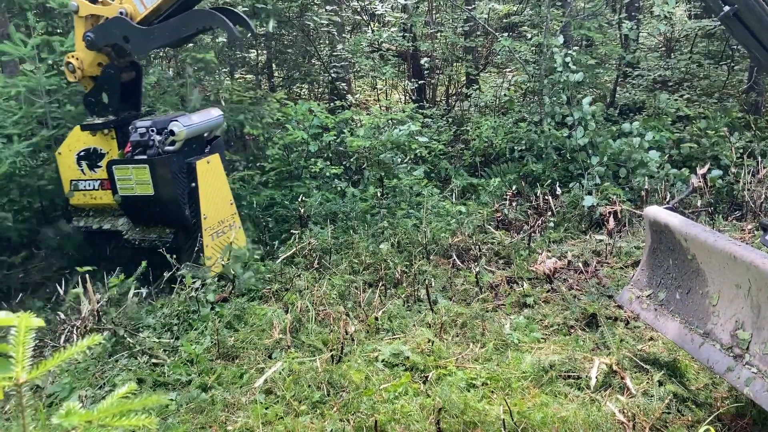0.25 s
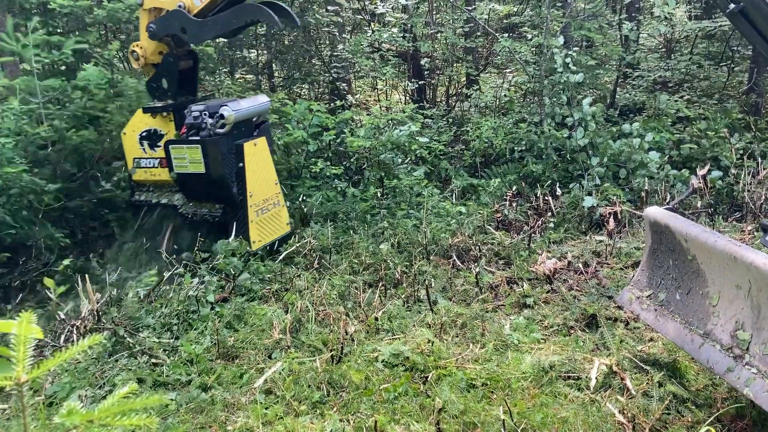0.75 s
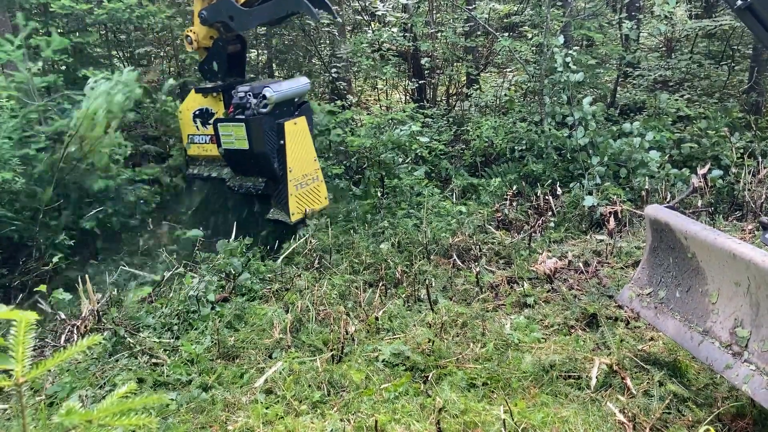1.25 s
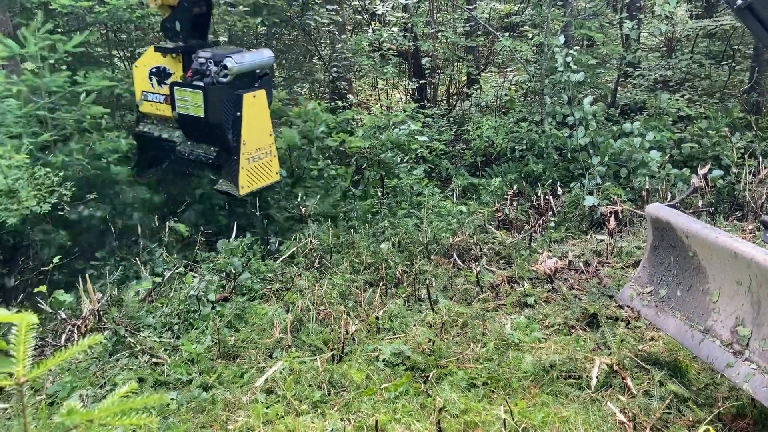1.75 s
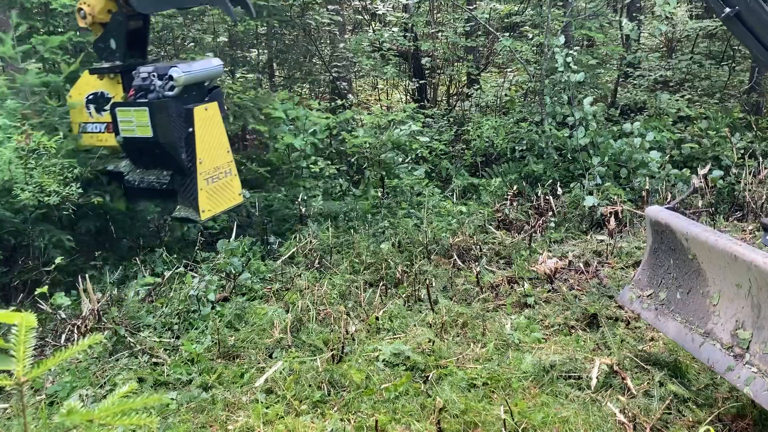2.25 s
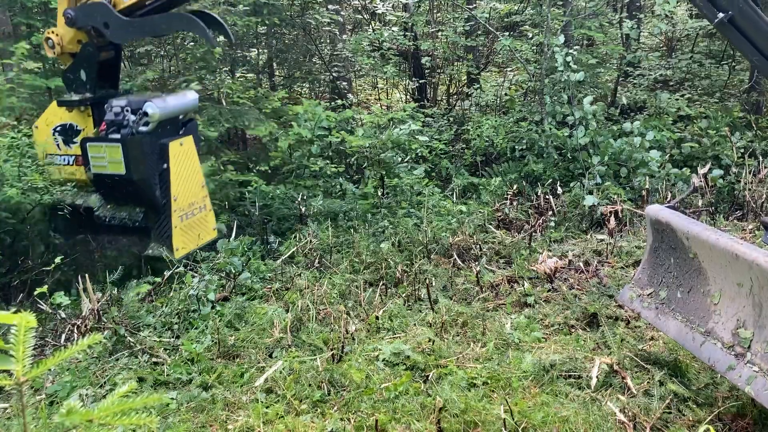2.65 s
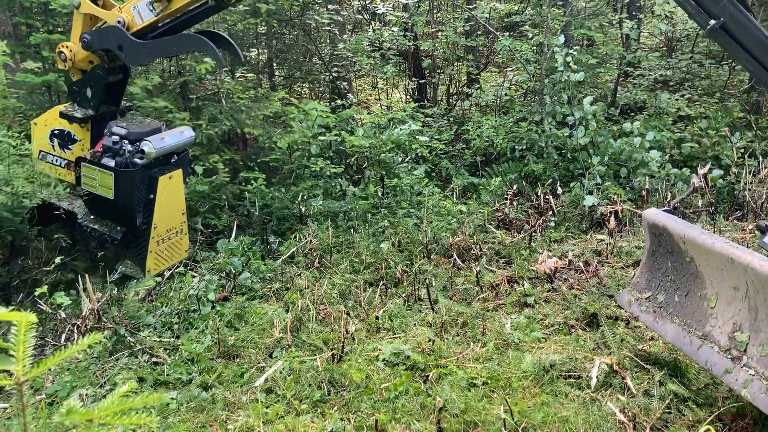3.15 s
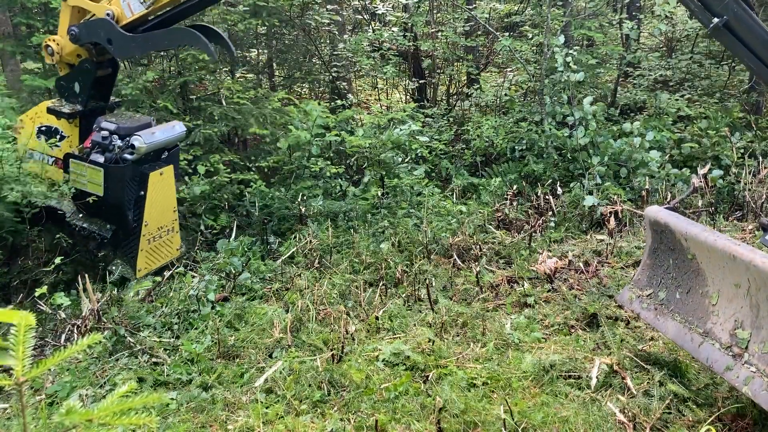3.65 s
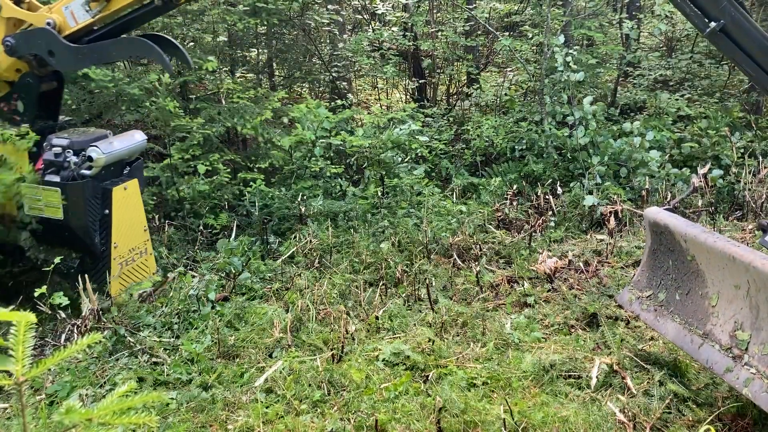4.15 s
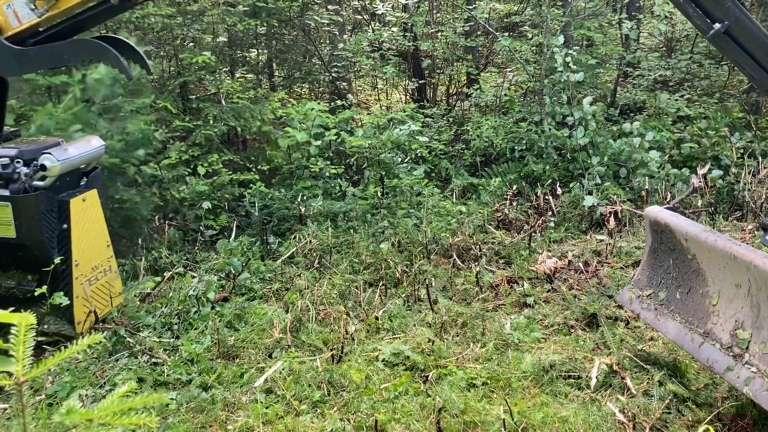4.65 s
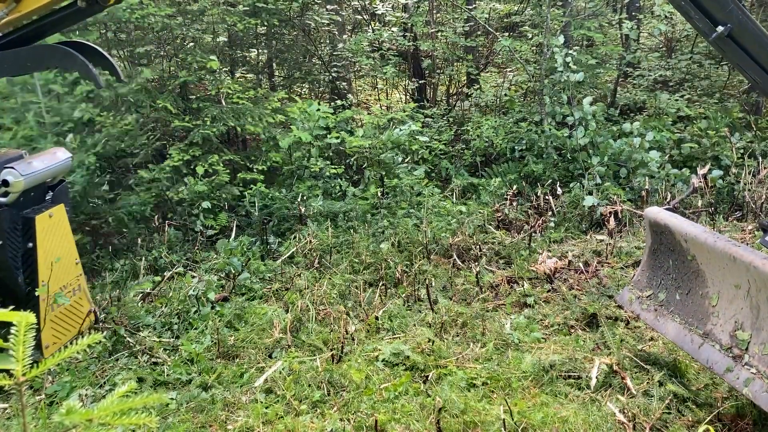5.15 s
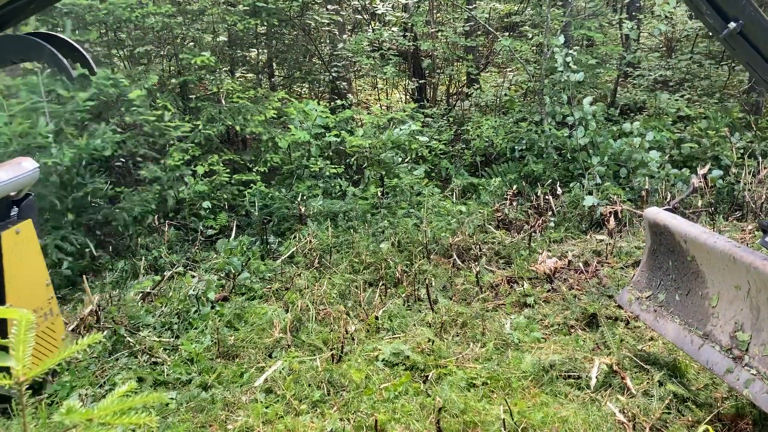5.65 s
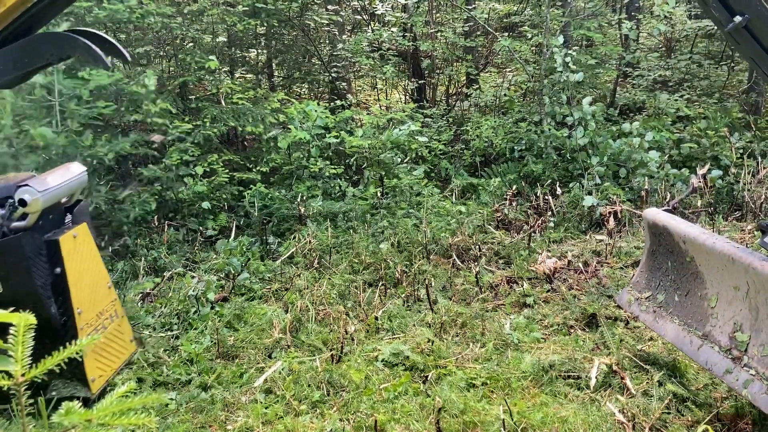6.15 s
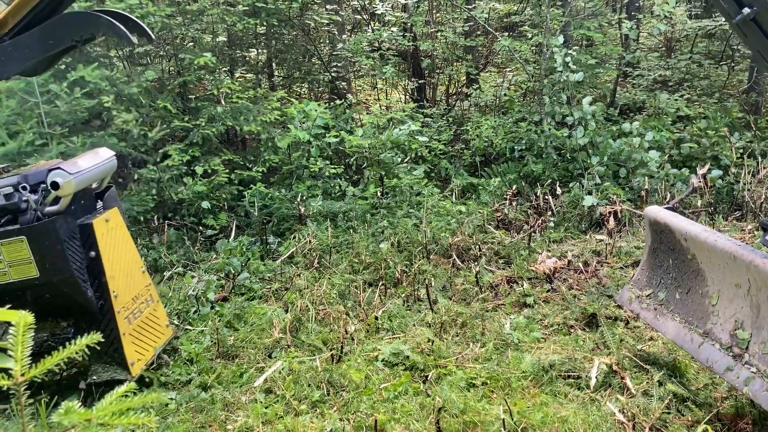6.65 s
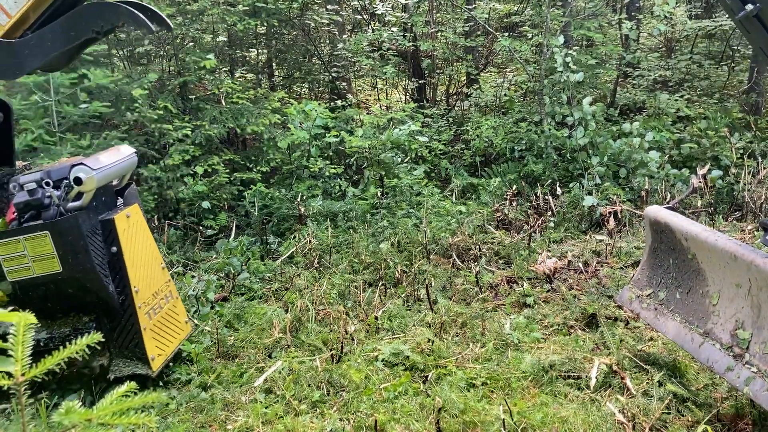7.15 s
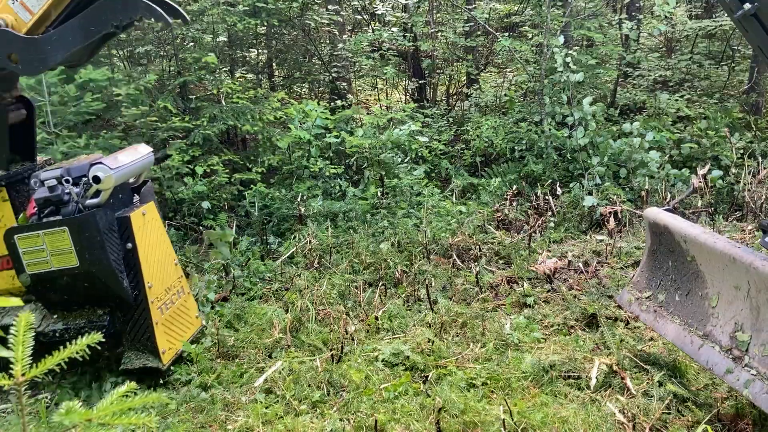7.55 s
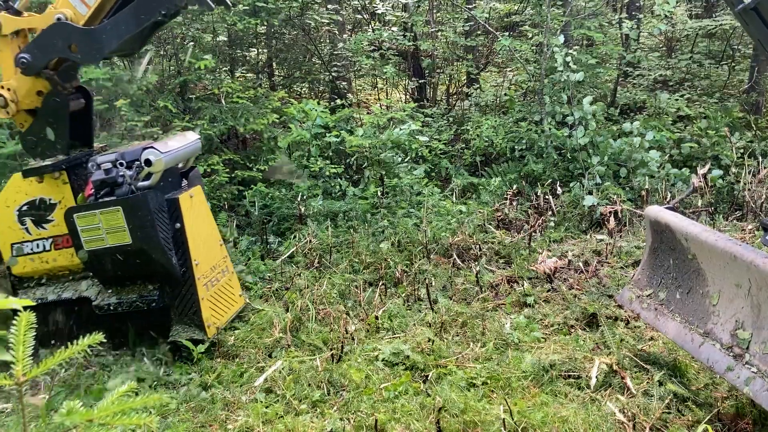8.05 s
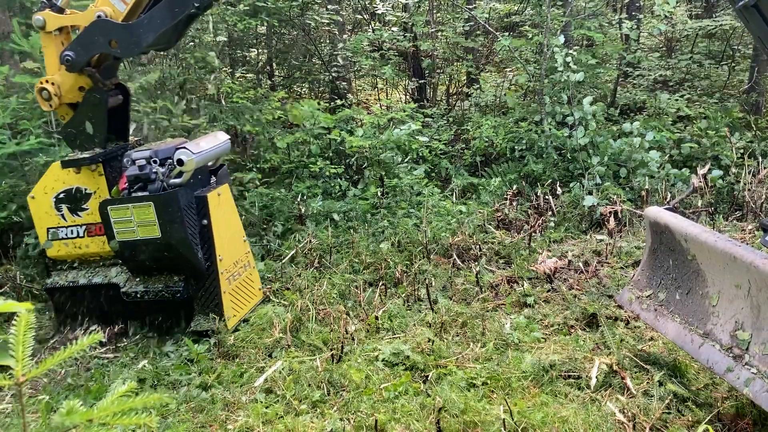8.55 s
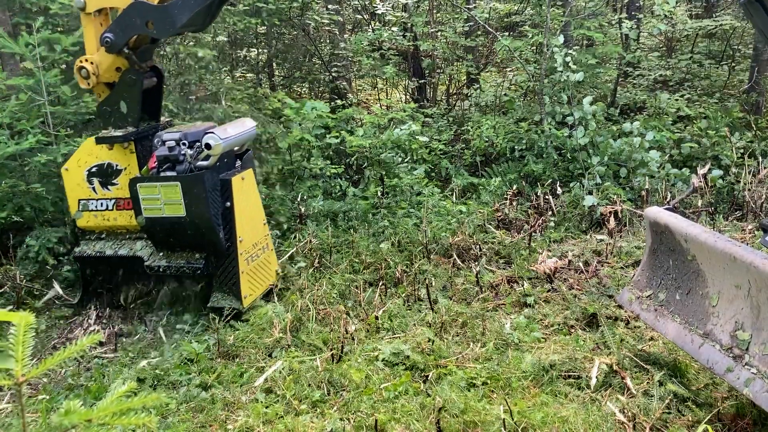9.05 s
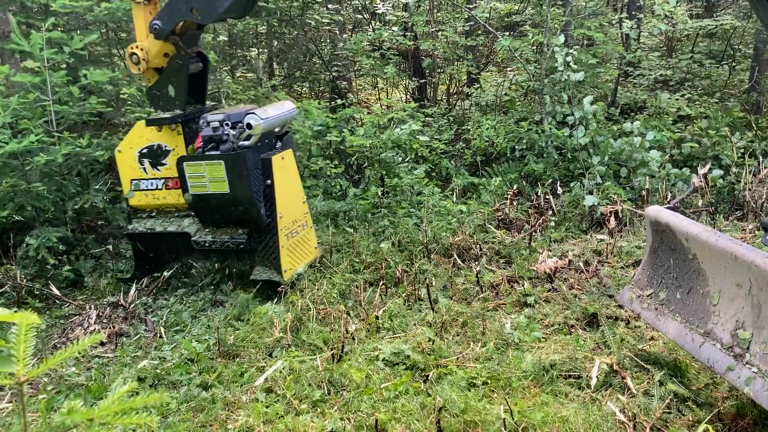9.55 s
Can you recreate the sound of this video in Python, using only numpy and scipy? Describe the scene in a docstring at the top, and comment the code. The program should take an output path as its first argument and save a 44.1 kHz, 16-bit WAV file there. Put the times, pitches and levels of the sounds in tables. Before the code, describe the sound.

A small petrol engine drones with a steady throb while a mulcher shreds brush in bursts, with sharp wood cracks and metallic knocks.

```python
"""Mulcher in a forest

A petrol twin drives a mulcher rotor a few metres to the left. Its firing orders drone, and a rotor hum
just under the fifth order beats with it in a steady throb. Teeth shred brush in bursts, stems crack
against the steel hood; the ground mirrors the drone and the trees scatter the rest back."""
import sys
import numpy as np
from scipy import signal
from scipy.fft import rfft, irfft
from scipy.io import wavfile
from scipy.ndimage import uniform_filter1d, map_coordinates

SR = 44100
rng = np.random.default_rng(int(sys.argv[2]) if len(sys.argv) > 2 else 0)


def pcm_store(signal):
    """Save signal as 16-bit PCM."""
    levels = np.round(np.clip(np.atleast_2d(signal), -1, 1) * 32767)
    wavfile.write(sys.argv[1], SR, levels.astype(np.int16).T)


N = 432621
T = np.arange(N) / SR
BIN_HZ = np.arange(N // 2 + 1) * SR / N + 1e-3


def undb(db):
    """Gain of a level in dB."""
    return 10 ** (np.asarray(db) / 20)


def curves(table):
    """Columns of a time table, sample by sample."""
    times, *columns = np.transpose(table)
    return [np.interp(T, times, column) for column in columns]


def gains(points):
    """Gain at every spectral bin from (Hz, dB) points."""
    hz, db = np.transpose(points)
    return undb(np.interp(np.log(BIN_HZ), np.log(hz), db))


def colour(x, points):
    """x shaped by a spectrum; rms 1."""
    shaped = irfft(rfft(x) * gains(points), N)
    return shaped / np.sqrt(np.mean(shaped ** 2))


def walk(rate_hz):
    """Random steps, smoothed twice; spread near 1."""
    hold = int(SR / rate_hz)
    steps = np.repeat(rng.standard_normal(N // hold + 1), hold)
    return 1.09 * uniform_filter1d(uniform_filter1d(steps, hold), hold)[:N]


def bursts(rows, idle_db, attack_s=0.0058, release_s=0.025):
    """Gain that rises, holds and decays for each (start s, length s, dB) row, over an idle level."""
    power = np.full(N, undb(2 * idle_db))
    for start, length, db in rows:
        rise = np.clip((T - start) / attack_s, 0, 1)
        fall = np.exp(-np.maximum(T - start - length, 0) / release_s)
        power += (undb(db) * rise * fall) ** 2
    return np.sqrt(power)


def place(out, start_s, peak_db, shape):
    """Adds one event to out at a given peak level."""
    part = out[int(start_s * SR):int(start_s * SR) + len(shape)]
    part += undb(peak_db) * shape[:len(part)] / np.abs(shape).max()


# Each row: time in seconds, engine cycle rate in Hz, engine level in dB.
ENGINE_RUN = [(0, 29.47, -31.5), (.35, 29.54, -30), (.95, 28.9, -31), (1.5, 28.86, -29.5),
              (1.8, 29.46, -30), (2.7, 29.35, -29), (3.0, 29.19, -29), (3.9, 29.59, -29.5),
              (4.25, 29.4, -27), (4.55, 28.91, -28.5), (5.1, 29.16, -27.5), (5.45, 28.93, -26.5),
              (6.3, 29.12, -26), (6.7, 29.49, -26.5), (7.6, 29.56, -27), (7.85, 29.2, -28),
              (8.15, 28.32, -32.5), (8.45, 28.44, -29.5), (8.95, 29.5, -29.5), (9.81, 29.52, -30)]
# The swinging head. Each row: time in seconds, lead at the left microphone port in ms,
# facing (0-1, exhaust side toward the listener), rotor hum in dB re engine level.
HEAD_SWING = [(0, 0.16, 0.46, 6.5), (1.25, 0.099, 0.4, 4.5), (2.1, .15, 0.6, 8.5), (3.0, 0.15, 0, 5),
              (4.2, 0.18, 0.43, 5.5), (5.3, .22, 1, 4.5), (6.0, .21, 1, 5), (6.9, 0.19, 1, 6.5),
              (7.8, 0.18, 0.84, 6.5), (8.2, 0.17, .2, 5), (9.0, 0.15, 0.27, 8.5), (9.5, .12, 0, 10.5),
              (9.81, 0.11, 0.11, 5.5)]
# Each row: multiple of the cycle rate, dB re engine level, dB added at full facing, slow waver in dB.
STRONG_ORDERS = [(2, 3.5, 0.5, 0), (3, 4.5, -6.5, 2.5), (4, -5, -5.5, 3), (6, -1, -9, 3),
                 (8, -9.5, -3.7, 3.5), (11, -8.5, 3.1, 0), (19, -13, -4.7, 3.5)]
# Each row: multiple of the cycle rate, dB re engine level.
FAINT_ORDERS = [(1, -29), (7, -17), (9, -17), (10, -13), (12, -24.5), (13, -17), (14, -17.5), (16, -23.5),
                (18, -26), (21, -19.5), (28, -24), (32, -25), (41, -23.5), (46, -35)]
ODD_LEAD_TURNS = 0.1
def firing_orders(cycles, engine_db, facing, fifth_db=5, fifth_facing_db=-6.5):
    """Harmonics of the engine cycle; uneven burning shakes the higher strong orders more."""
    def tone(turns, db):
        return np.sqrt(2) * undb(engine_db + db) * np.sin(2 * np.pi * turns)
    out = tone(5 * cycles + ODD_LEAD_TURNS, fifth_db + fifth_facing_db * facing)
    for order, db, facing_db, waver_db in STRONG_ORDERS:
        turns = order * cycles + order % 2 * ODD_LEAD_TURNS + 0.012 * order * walk(5)
        out += tone(turns, db + facing_db * facing + waver_db * walk(3) + 1.55 * walk(7))
    for order, db in FAINT_ORDERS:
        turns = order * cycles + rng.random() + 0.085 * walk(5)
        out += tone(turns, db + 3 * walk(2.92))
    return out


# Every second quiet moment of the throb, in seconds.
THROB_DIPS_S = [-.098, .587, 1.293, 2.009, 2.735, 3.44, 4.184, 4.916, 5.603, 6.351, 7.036, 7.766, 8.472,
                9.145, 9.849]
def rotor_hum(cycles, level_db):
    """Hum at twice the rotor rate, slipping one wave per throb behind order 5. Returns hum, rotor turns."""
    throbs = np.interp(T, THROB_DIPS_S, 2 * np.arange(len(THROB_DIPS_S)))
    waves = 5 * cycles - throbs
    hum = -np.sin(2 * np.pi * (waves + ODD_LEAD_TURNS))  # opposes order 5 at each dip
    return np.sqrt(2) * undb(level_db) * hum, waves / 2


# Each row: time in seconds, delay of the ground path in ms.
GROUND_DELAY = [(0, 0.98), (.3, 1.46), (.9, 0.93), (1.45, 1.34), (1.8, 2.2), (2.5, 2.07), (3.0, 1.55),
                (4.0, 1.61), (4.5, 1.69), (5.1, 1.08), (7.7, 1.01), (8.4, 1.88), (9.0, 2), (9.3, 2.23),
                (9.81, 1.86)]
def ground_echo(drone, gain_db=-4.5):
    """The ground mirrors the drone; the delay moves as the head rises and sinks."""
    delay = curves(GROUND_DELAY)[0] * SR / 1000
    return undb(gain_db) * map_coordinates(drone, [np.arange(N) - delay], order=1, mode="nearest")


# Each row: frequency in Hz, relative level in dB.
ROAR_SPECTRUM = [(35, -7), (70, 15), (130, 11), (200, 2.5), (300, 0), (570, 3.5), (750, -5.5),
                 (1500, -10.5), (2600, -16.5), (5000, -17.5), (16000, -28.5)]
def exhaust_roar(cycles, engine_db, above_engine_db=3):
    """Exhaust noise that puffs with two unevenly spaced firings per cycle."""
    puffs = np.exp(-(cycles % 1) / 0.46) + 1.8 * np.exp(-((cycles - 0.375) % 1) / 0.34)
    gas = (1.05 + puffs) * rng.standard_normal(N)
    return undb(engine_db + above_engine_db) * colour(gas, ROAR_SPECTRUM)


# Each row: centre in Hz, width in Hz, dB re engine level, dB added at full facing.
PANEL_MODES = [(896, 134, -16.5, 7), (2640, 270, -15.5, 3.5)]
def housing_panels(engine_db, facing):
    """Narrow resonances of the housing, shaken at random."""
    out = np.zeros(N)
    for hz, width_hz, db, facing_db in PANEL_MODES:
        ring = signal.lfilter(*signal.iirpeak(hz, hz / width_hz, SR), rng.standard_normal(N))
        out += undb(engine_db + db + facing_db * facing + 1.4 * walk(12)) * ring / ring.std()
    return out


# Each row: start in seconds, length in seconds, typical tick in dB re the weakest shredding grain.
STUB_CONTACTS = [(4.3, 0.14, -4), (4.9, 0.96, 10.5), (7.87, 0.785, 8.5), (9.0, .3, 13)]
def stub_ticks(rotor_turns, spread_db=2.2):
    """One tooth clips a stub on every rotor turn: impulses of random size."""
    turn = np.floor(rotor_turns + 0.3).astype(int)
    size_db = spread_db * rng.standard_normal(int(80 * N / SR))
    strikes = np.diff(turn, prepend=0) > 0
    return strikes * bursts(STUB_CONTACTS, idle_db=-1.5) * undb(size_db[turn])


def tearing_grains(spread_db, ticks=0, per_s=100, decay_s=0.0014):
    """Envelope of dense small fractures over a steady floor; a few are far louder than the rest."""
    strikes = rng.random(N) < per_s / SR
    sizes = undb(spread_db * np.minimum(rng.exponential(size=N), 3.5))
    grains = signal.fftconvolve(strikes * sizes + ticks, np.exp(-T[:300] / decay_s))[:N]
    return (1.13 + grains) * undb(0.79 * walk(25))


# Torn leaves, twigs and split wood. Each row: frequency in Hz, relative level in dB.
LEAF_SPECTRUM = [(3000, -25), (6000, 0.5), (8500, -2), (12000, -3.5), (16000, -12)]
TWIG_SPECTRUM = [(1200, 4), (2600, -2.5), (3600, 0.5), (4600, 9), (6000, -14), (9000, -28.5)]
WOOD_SPECTRUM = [(300, -18), (800, -6.5), (1500, -5.5), (2200, -7.5), (4000, -4), (16000, -55)]
# Each row: start in seconds, length in seconds, leaf hiss in dB, wood grind in dB re leaf hiss.
BRUSH_BITES = [(0, .1, -36.5, -3), (0.428, 0.37, -38, 3), (0.727, .16, -31, 5), (0.81, 0.025, -27.5, 1),
               (1.036, 0.21, -34.5, 2), (1.264, 0.33, -38, 3.5), (1.64, 0.043, -34.5, 3),
               (2.517, 0.074, -36, 2), (3.098, 0.27, -46, -7), (4.236, 0.24, -30.5, 0),
               (4.474, 0.031, -31.5, 8.5), (4.542, 0.42, -41, -11), (4.97, 0.56, -35, -9),
               (5.22, .03, -29.5, -8), (5.3, 0.04, -34, 2.5), (5.579, 0.19, -39, -2), (5.772, 0.2, -35, 5),
               (5.98, 0.33, -38.5, 1.5), (6.349, 0.69, -50, 1), (7.176, .07, -36.5, -5),
               (7.407, 0.38, -37, -0.5), (7.778, 0.028, -22.5, 0.5), (7.83, 0.077, -31.5, 1),
               (7.889, 0.054, -26.5, -2), (7.95, .07, -27, 5), (8.022, .2, -33.5, 3),
               (8.25, 0.617, -38.5, 2.5), (8.874, 0.28, -40, 8.5), (8.98, 0.029, -34, -3),
               (9.486, .03, -34, 3), (9.62, .04, -37, 5), (9.667, 0.034, -29, 2.5), (9.79, .05, -36, -2)]
def shredding(ticks, facing, twig_db=-3.5, twig_facing_db=3):
    """Teeth bite into brush: leaves and twigs tear together, wood splits on grains of its own."""
    tearing = tearing_grains(spread_db=3.3, ticks=ticks)
    leaves = colour(tearing * rng.standard_normal(N), LEAF_SPECTRUM)
    twigs = colour(tearing * rng.standard_normal(N), TWIG_SPECTRUM)
    twigs *= undb(twig_db + twig_facing_db * facing)
    wood = colour(tearing_grains(spread_db=5) * rng.standard_normal(N), WOOD_SPECTRUM)
    leaf_rows = [row[:3] for row in BRUSH_BITES]
    wood_rows = [(start, length, db + wood_db) for start, length, db, wood_db in BRUSH_BITES]
    return bursts(leaf_rows, idle_db=-45) * (leaves + twigs) + bursts(wood_rows, idle_db=-37.5) * wood


# Each row: frequency in Hz, relative level in dB, free T60 in seconds.
HOOD_MODES = [(750, 0, .09), (1035, -1, .12), (1340, -12, .1), (1473, -13, 1.2), (1623, -8, .9),
              (1976, -4, .16), (2026, 3, .32), (2730, -20, .09), (2950, -6, .07)]
# Each row: start in seconds, peak in dB, tilt in dB per octave, share of the free T60.
STEM_HITS = [(0.05, -16.5, 10, 0.5), (0.37, -25, 17, .4), (0.525, -15, 10, 0.3), (0.70, -20, 14, 0.41),
             (0.748, -7.5, -5, 0.51), (0.82, -9, -2, 0.8), (0.84, -6.5, -10, 0.49), (1.08, -25, 2, .4),
             (1.138, -15.5, -5, 0.44), (1.22, -19.5, 5, 0.48), (1.49, -21, 10, 0.5), (1.649, -24, 6, 0.23),
             (4.502, -10.5, -7, 0.18), (5.355, -9.5, -15, 0.13), (7.783, -20, 5, .2), (7.967, -17, 3, .15),
             (9.02, -21, 2, .3), (9.67, -25.5, 8, 0.25)]
def hood_knocks(attack_s=0.0011):
    """Stems ring the steel hood; each lands elsewhere on the sheet, and brush rubs it as it rings."""
    t, out = T[:SR // 2], np.zeros(N)
    for start, peak_db, tilt_db, share in STEM_HITS:
        ring = np.zeros(len(t))
        for hz, db, t60_s in HOOD_MODES:
            spot, phase = rng.random(2)
            gain = undb(db + tilt_db * np.log2(hz / 1500) + 3.2 * (spot - 0.5))
            decay = undb(-60 * t / (t60_s * share))
            ring += gain * decay * np.sin(2 * np.pi * (hz * t + phase))
        rub = 1 + 3 * uniform_filter1d(rng.standard_normal(len(t)), 100)
        place(out, start, peak_db, ring * rub * np.minimum(t / attack_s, 1))
    return out


# Each row: start in seconds, peak in dB, centre in Hz.
SHARP_CRACKS = [(.7462, -6, 3140), (.825, -3.5, 3040), (4.3853, -7, 5056), (4.4309, -10, 4600),
                (4.4684, -15.5, 4960), (4.4836, 1, 4680), (4.5017, -5.5, 4647), (4.869, -8, 7480),
                (5.0291, -8, 11380), (5.1126, -11, 4645), (5.1554, -12, 4520), (5.2323, -10, 4310),
                (5.2455, -8, 4300), (5.294, -4.5, 4277), (5.3087, -3, 4300), (5.3224, -0.5, 4150),
                (5.338, -2, 4300), (5.354, -2.5, 4305), (5.367, -7, 4300), (5.3987, -6, 5460),
                (5.4405, -16, 11300), (5.5329, -10.5, 4653), (5.687, -11.5, 4373), (5.792, -20, 3873),
                (5.815, -5.5, 4685), (5.88, -10, 4447), (5.913, -3.5, 11490), (7.7478, -11, 4640),
                (7.7855, -7, 4920), (7.8392, -13, 4850), (7.867, -6, 4493), (7.8927, -2, 4450),
                (7.9557, -8.5, 4440), (8.3158, -12.5, 4656), (8.5574, -11.5, 4770), (9.075, -14, 4136)]
def sharp_cracks():
    """Sharp pitched clicks: single twig snaps, and quick runs of a tooth striking wood once per turn."""
    t, out = T[:SR // 10], np.zeros(N)
    decay = np.exp(-t / 0.0008) + 0.068 * np.exp(-t / 0.006)
    for start, peak_db, hz in SHARP_CRACKS:
        burst = rng.standard_normal(len(t)) * decay
        click = 0.11 * np.diff(burst, prepend=0)
        ring = signal.lfilter(*signal.iirpeak(hz, Q=1.5, fs=SR), burst)
        place(out, start, peak_db, click + ring)
    return out


# Each row: start in seconds, peak in dB.
THUD_HITS = [(1.36, -26), (1.948, -10.5), (2.36, -16), (2.929, -23), (7.22, -20), (9.2, -22)]
def thuds(hz=80, decay_s=0.0126):
    """Low thuds: a sine that swells and dies within a few waves."""
    t, out = T[:SR // 2], np.zeros(N)
    thud = np.sin(2 * np.pi * hz * t) * t * np.exp(-t / decay_s)
    for start, peak_db in THUD_HITS:
        place(out, start, peak_db, thud)
    return out


def tree_scatter(x, gain_db=-2.5, t60_s=0.12, band_hz=(370, 6100), patterns=80):
    """Scatter from the trunks, unrelated at the two ports; the pattern keeps changing as the head swings."""
    hop = N // patterns + 1
    band = signal.sosfilt(signal.butter(1, band_hz, "band", fs=SR, output="sos"), x)
    padded = np.pad(band, (hop, 2 * hop))
    decay = undb(-60 * T[:SR // 3] / t60_s)
    decay *= undb(gain_db) / np.sqrt(np.sum(decay ** 2))
    out = np.zeros((2, len(padded) + len(decay)))
    for i in range(0, N + hop, hop):
        piece = padded[i:i + 2 * hop] * np.sqrt(np.hanning(2 * hop))
        echoes = signal.fftconvolve(piece[None], rng.standard_normal((2, len(decay))) * decay)
        out[:, i:i + echoes.shape[1]] += echoes
    return out[:, hop:hop + N]


# Each row: frequency in Hz, left minus right level in dB.
SIDE_BALANCE = [(60, -1.7), (130, .4), (500, 0.6), (1200, 4), (2500, 2), (5000, 2.5)]
def scene():
    """The mulcher reaches the left port first; trunks scatter its noisy part back to both ports."""
    cycle_hz, engine_db = curves(ENGINE_RUN)
    lead_ms, facing, hum_db = curves(HEAD_SWING)
    cycles = np.cumsum(cycle_hz) / SR
    hum, rotor_turns = rotor_hum(cycles, engine_db + hum_db)
    drone = firing_orders(cycles, engine_db, facing) + hum
    noisy = exhaust_roar(cycles, engine_db) + housing_panels(engine_db, facing)
    noisy += shredding(stub_ticks(rotor_turns), facing)
    noisy += sharp_cracks() + hood_knocks() + thuds()
    mulcher = drone + ground_echo(drone) + noisy
    half_lead = lead_ms * SR / 2000
    ports = [map_coordinates(mulcher, [np.arange(N) + side * half_lead], order=3, mode="nearest")
             for side in (1, -1)]
    left_gain = np.sqrt(gains(SIDE_BALANCE))
    return irfft(rfft(ports + tree_scatter(noisy)) * [left_gain, 1 / left_gain], N)


# Each row: frequency in Hz, microphone gain in dB.
MIC_RESPONSE = [(5000, 1), (6800, -0.5), (8200, 7), (10000, 6.5)]
SPLIT_HZ, TREBLE_LAG_MS, TOP_HZ = 6160, 0.2198, 15750
def record(dry):
    """Above the split, left carries the right port inverted and late; peaks round off, the top is cut."""
    left, right = rfft(dry) * gains(MIC_RESPONSE)
    low = 1 / (1 + (BIN_HZ / SPLIT_HZ) ** 16)
    inverted = -right * np.exp(-2j * np.pi * BIN_HZ * TREBLE_LAG_MS / 1000)
    stereo = irfft([low * left + (1 - low) * inverted, right], N)
    rounded = 0.93 * stereo / (1 + stereo ** 6) ** (1 / 6)
    return signal.sosfilt(signal.ellip(12, 0.2, 85, TOP_HZ, fs=SR, output="sos"), rounded)


dry = scene()
out = record(dry)
pcm_store(out)
```